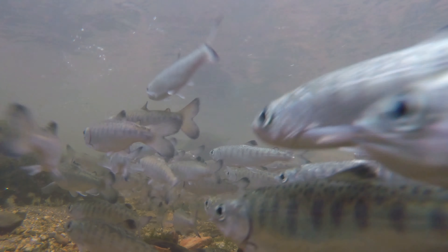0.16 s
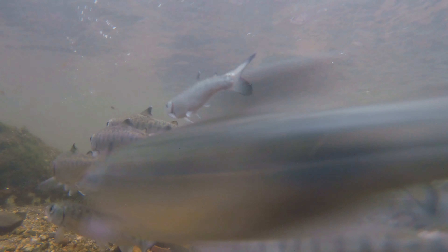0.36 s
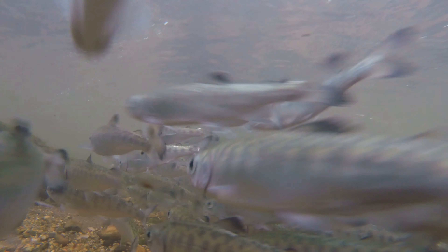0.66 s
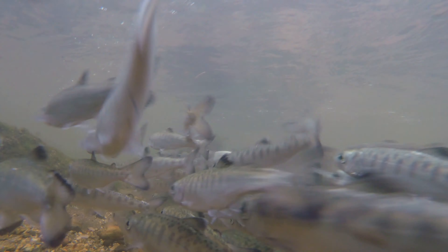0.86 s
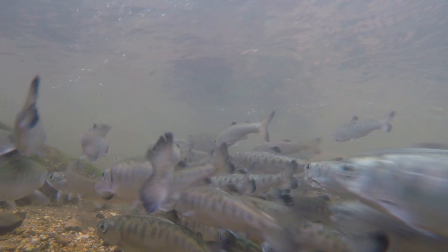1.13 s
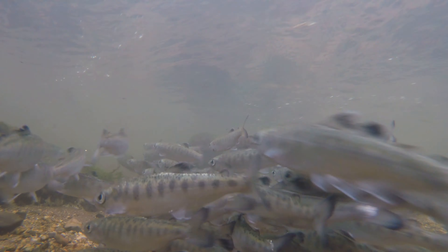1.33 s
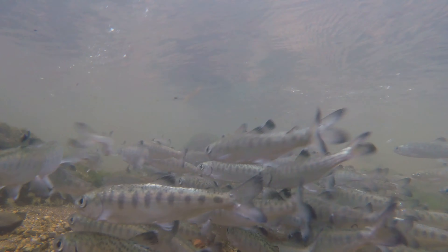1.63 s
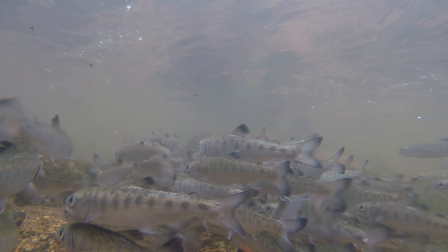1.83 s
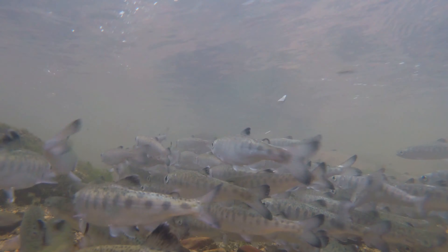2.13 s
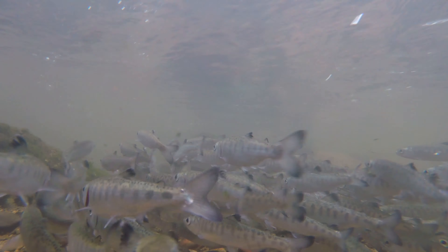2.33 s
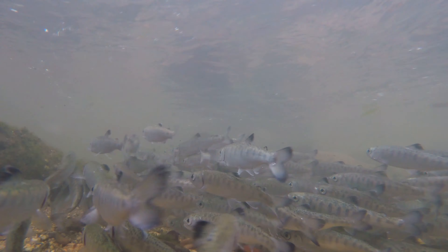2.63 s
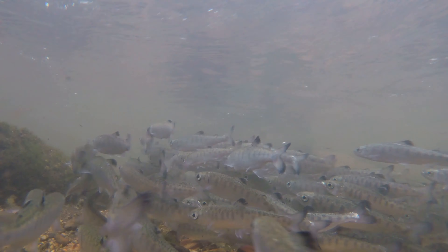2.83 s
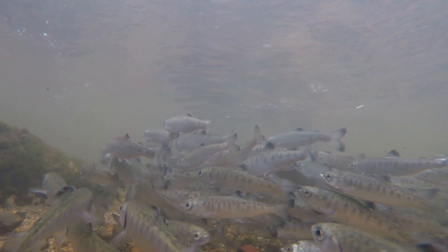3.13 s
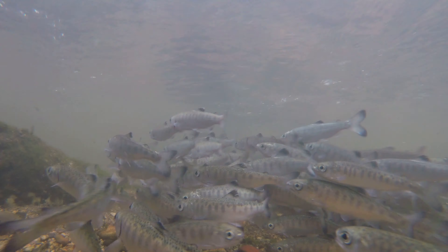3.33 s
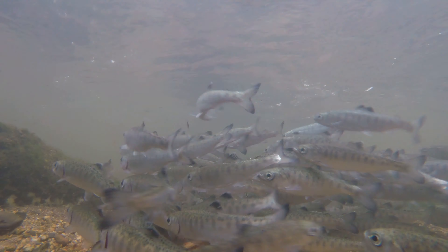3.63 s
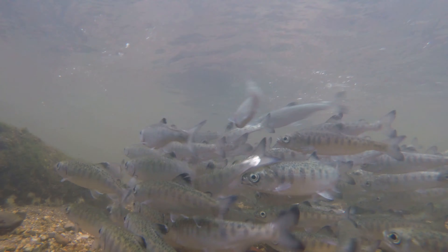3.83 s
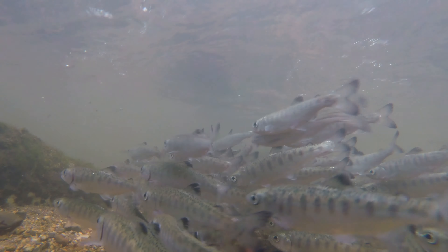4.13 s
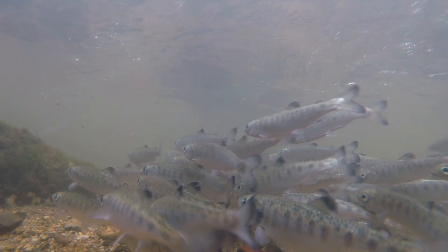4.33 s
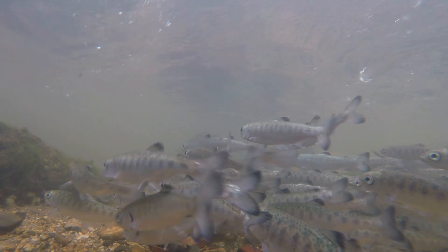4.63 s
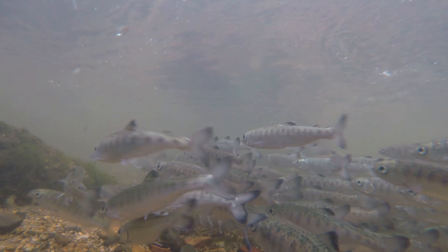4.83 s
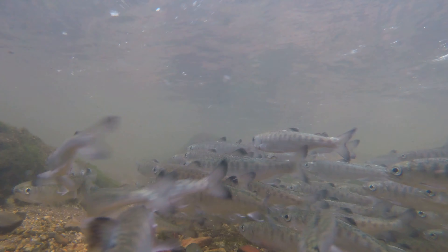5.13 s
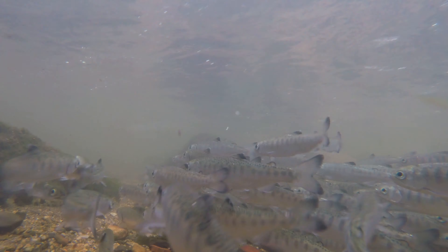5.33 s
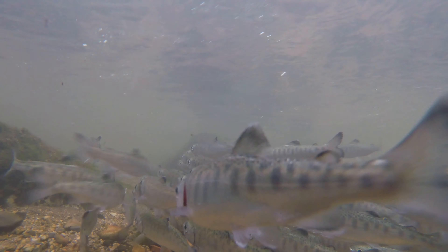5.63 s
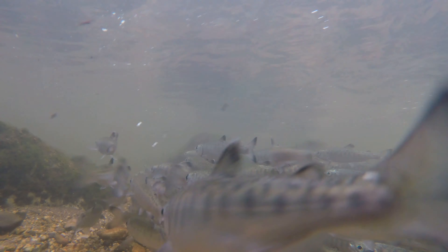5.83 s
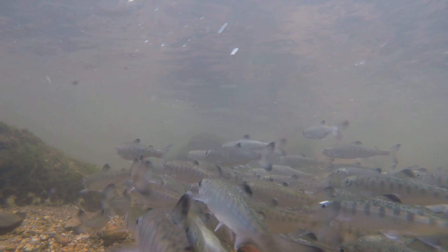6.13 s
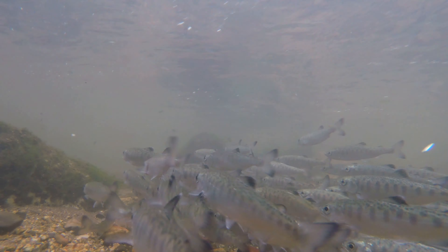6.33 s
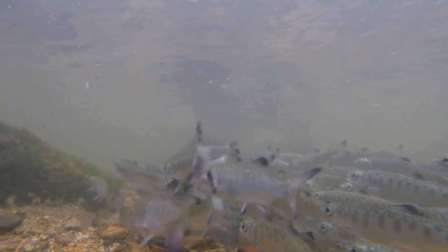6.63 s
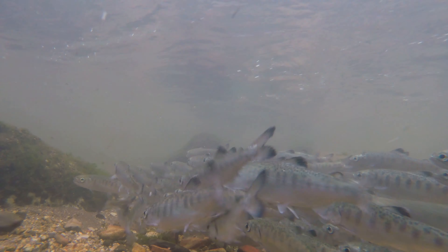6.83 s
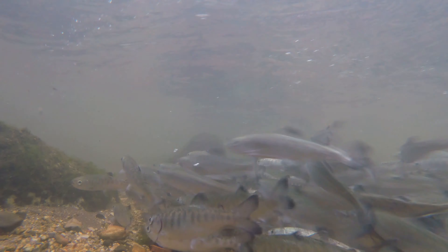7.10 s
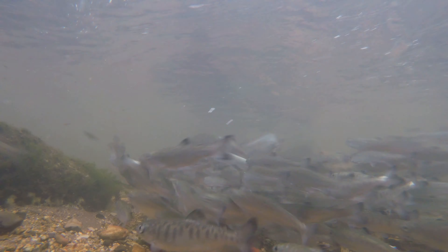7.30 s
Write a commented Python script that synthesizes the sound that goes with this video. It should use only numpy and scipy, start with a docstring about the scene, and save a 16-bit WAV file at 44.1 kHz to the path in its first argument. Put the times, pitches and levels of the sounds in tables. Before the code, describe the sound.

Muffled underwater creek rumble with deep irregular thumps, fish knocking and rubbing a sealed microphone case at the start and end, and soft bubbly gurgling between.

```python
"""On a creek bed, a microphone in a sealed case sits among a shoal of small fish.
Turbulence rumbles and eddies thump on the case: shaped noise and short, sagging low tones.
Bubbles are decaying tones, the crowded ones filtered by the resonances of the case.
Fish excite damped wall modes when they bump the case and scrub it with filtered noise.
Faint ticks and the hiss of the microphone are further bands of noise."""
import sys
import numpy as np
from scipy import signal
from scipy.io import wavfile
from scipy.ndimage import uniform_filter1d

SR = 44100
rng = np.random.default_rng(int(sys.argv[2]) if len(sys.argv) > 2 else 0)


def output_pcm(signal):
    """Save a mono or channel-first signal as 16-bit PCM at the path in sys.argv[1].

    Samples are clipped to [-1, 1] before scaling.
    """
    pcm = np.clip(np.atleast_2d(signal).T, -1, 1) * 32767
    wavfile.write(sys.argv[1], SR, np.round(pcm).astype(np.int16))


N = 329162  # length in samples

# In every spectrum table density_db is relative, per Hz: coloured() sets the rms to 1.
# Hiss of the microphone: frequency_hz, density_db
HISS_SPECTRUM = [(2500, 1), (4000, -9), (7000, 1.5), (9500, -1.5), (12000, -8.5), (14000, -10.5),
                 (15100, -17), (16500, -22)]
HISS_DB = -64.5
BAND_EDGE_HZ = 15100

# Slow buffeting of the current: time_s, level_db
BUFFET_LEVEL = [(0.0, -23), (0.48, -23), (0.73, -29), (3.09, -37.5), (5.32, -23.5), (5.69, -34.5),
                (6.48, -21.5), (6.71, -24), (7.46, -26.5)]
# Spectrum of the buffeting: frequency_hz, density_db
BUFFET_SPECTRUM = [(8, -36), (16, -8.5), (30, -5), (45, -12.5), (70, -27)]
# Spectrum of the steadier turbulent rumble: frequency_hz, density_db
RUMBLE_SPECTRUM = [(18, -40), (30, -4), (60, -0.5), (97, -1.5), (173, -9.5), (279, -17), (335, -24),
                   (472, -26.5), (560, -32), (730, -42.5), (1230, -120)]
RUMBLE_DB = -26

# Faint ticks: start_s, level_db (before the soft onset)
TICKS = [(6.785, -60), (6.801, -56), (6.822, -47), (6.85, -55), (6.879, -52), (6.893, -49), (7.243, -58),
         (7.278, -51), (7.33, -45)]
# Spectrum of the ticks: frequency_hz, density_db
TICK_SPECTRUM = [(4500, -30), (5800, 3), (7300, -14), (9000, -4), (10300, -13), (12000, -30)]
TICK_T60_S = 0.027

# Bubbly water: time_s, gurgle_db, fizz_db
CURRENT_LEVELS = [(0, -46, -64), (.8, -43, -56), (1.5, -35, -54.5), (2.2, -35.5, -56.5), (3.2, -34.5, -55),
                  (4.5, -36.5, -55), (7.46, -33.5, -53.5)]
# Transmission of the gurgle through the case: frequency_hz, density_db
CASE_GURGLE = [(280, -41), (480, -22.5), (559, -11), (742, 0.5), (811, -5.5), (1010, -13.5), (1150, -7.5),
               (1260, -16), (1400, -14), (1810, -28), (2250, -25.5), (2500, -35), (3250, -51), (5500, -120)]
# Transmission of the fizz through the case: frequency_hz, density_db
CASE_FIZZ = [(1470, -34), (2500, -5.5), (2990, 3), (3350, -1), (4010, -21), (4530, -10.5), (4890, -16.5),
             (5320, -5), (5640, -4), (6150, -5.5), (6600, -12), (7120, -18), (8000, -30), (10400, -48)]
# The largest bubbles: start_s, peak_db, pitch_hz (at the onset)
LARGE_BUBBLES = [(0.47, -34.5, 5360), (0.88, -37, 2480), (1.025, -32, 3070), (1.158, -36.5, 2770),
                 (1.353, -33, 3070), (1.369, -34, 3000), (1.412, -34, 2750), (1.483, -27.5, 900),
                 (1.58, -22, 739), (1.675, -34.5, 2791), (1.758, -34.5, 2850), (1.837, -37, 5470),
                 (1.985, -32.5, 3000), (2.019, -38.5, 6024), (2.047, -28, 734), (2.075, -23, 734),
                 (2.112, -33.5, 1980), (2.283, -34.5, 1710), (2.362, -36.5, 1840), (2.37, -32, 2870),
                 (2.406, -30, 673), (2.543, -33.5, 2130), (2.598, -29, 1430), (2.766, -36.5, 2380),
                 (2.782, -25.5, 1140), (2.92, -34.5, 5540), (3.076, -24, 760), (3.24, -33.5, 5400),
                 (3.307, -39, 5150), (3.493, -22.5, 710), (3.56, -35, 2260), (4.197, -39, 2350),
                 (4.291, -38, 3130), (4.325, -24, 1125), (4.327, -21.5, 737), (4.393, -36, 2070),
                 (4.488, -34.5, 2700), (4.527, -30, 714), (4.589, -24.5, 735), (4.693, -39, 5300),
                 (4.579, -39, 5650), (4.795, -26, 727), (4.715, -37, 5400), (4.887, -35, 3000),
                 (4.864, -36, 2150), (4.918, -33.5, 2650), (5.083, -39.5, 5259), (5.295, -25.5, 803),
                 (5.324, -35, 5830), (5.348, -34.5, 2921), (5.366, -28, 698), (5.368, -36, 3030),
                 (5.513, -38, 2880), (5.66, -33.5, 2870), (5.778, -34.5, 5370), (5.835, -23.5, 784),
                 (5.869, -33, 2290), (5.907, -30, 2740), (6.049, -32.5, 1555), (6.131, -36, 2760),
                 (6.363, -37, 5700), (6.374, -25, 770), (6.405, -25.5, 693), (6.461, -24, 884),
                 (6.433, -39, 6000), (6.559, -33, 1540), (6.573, -27, 710), (6.687, -23.5, 712),
                 (6.82, -26.5, 787), (6.89, -34, 2791), (7.012, -35.5, 2200), (7.327, -34, 2110),
                 (7.356, -28, 1097), (7.396, -27, 772)]
BUBBLE_CYCLES = 56  # cycles to die by 60 dB at 1 kHz
SMALL_DAMPING = 0.18  # exponent: smaller, higher bubbles ring for fewer cycles

# Eddies and tail strokes pushing on the case: centre_s, peak_db, pitch_hz (at the centre)
THUMPS = [(0.028, -11.5, 48.4), (0.065, -9, 80), (0.239, -10.5, 56), (0.322, -12.5, 71), (0.357, -18, 35),
          (0.476, -9, 44.7), (0.501, -7, 61), (0.53, -10, 29.8), (1.01, -10.5, 50.7), (1.382, -15, 21.8),
          (1.975, -10.5, 60), (2.257, -10.5, 68.5), (2.597, -9, 86), (2.617, -6.5, 71), (3.058, -7, 83.4),
          (3.084, -6, 94), (3.249, -19, 91), (3.499, -12, 93), (4.055, -14, 82), (4.156, -12.5, 44.3),
          (4.466, -11, 70.4), (4.896, -10.5, 24), (5.181, -14.5, 28), (5.212, -15, 64.6), (5.35, -10, 33.6),
          (5.876, -8, 79), (5.903, -12, 78.5), (6.075, -13.5, 69), (6.253, -9.5, 31.2), (6.31, -10.5, 35),
          (6.361, -13.5, 62), (6.409, -11.5, 40), (6.462, -9.5, 36), (6.519, -9, 67), (6.528, -11, 115),
          (6.561, -10, 41.4), (6.881, -16.5, 88), (6.989, -16, 79), (7.057, -13, 99), (7.097, -10.5, 40),
          (7.121, -12, 98), (7.168, -11.5, 62.4), (7.214, -17, 43.7), (7.033, -15.5, 48), (7.301, -18, 107),
          (7.452, -11.5, 79)]
SWELL_CYCLES = 0.72  # standard deviation of the Gaussian swell, in cycles
SAG = 0.032  # pitch falls by twice this share per standard deviation

# Fish bumping the case: start_s, level_db (before modal weighting), centre_hz of the blow
KNOCKS = [(.011, -10, 325), (.034, -10, 406), (.062, -13.5, 486), (.148, -18, 385), (.197, -6, 295),
          (.212, -5, 420), (.225, -11, 364), (.256, -7.5, 640), (.264, -9.5, 600), (.461, -13, 200),
          (.499, -18, 283), (.737, -10.5, 293), (.767, -21, 340), (.827, -17, 312), (.874, -23, 390),
          (.898, -16, 690), (.98, -13.5, 417), (1.039, -21, 690), (6.938, -11, 312), (6.998, -18, 300),
          (7.023, -10, 303), (7.066, -3.5, 640), (7.095, -12, 250), (7.115, -10, 310), (7.154, -6, 325),
          (7.174, -16, 204), (7.197, -15.5, 204), (7.26, -11.5, 269), (7.286, -18.5, 317),
          (7.325, -13, 310), (7.396, -20, 273)]
# Modes of the case walls: frequency_hz (at the onset), level_db, t60_s (before water damping)
WALL_MODES = [(179.8, 1.5, 0.058), (264, -4, 0.028), (292.5, -6.5, 0.087), (399, -5.5, 0.033),
              (524, -7.5, 0.028), (619, -7.5, 0.035), (700, -6.5, 0.042), (894, -18, 0.017)]
WATER_DAMPING = 0.98  # factor on the wall decay times
# Fish bodies sliding along the case, one list a pass: time_s, level_db
BRUSHES = [
    [(0, -36.5), (.3, -34.5), (.6, -38.5), (1.05, -44)],
    [(6.93, -31), (7.05, -27.5), (7.17, -20), (7.3, -31.5), (7.46, -31)],
]
# Spectrum of the sliding: frequency_hz, density_db
BRUSH_SPECTRUM = [(90, -15), (160, -8), (295, 8.5), (450, -6), (700, -1.5), (1000, -47), (1600, -42)]


def gain_of(db):
    """Level to amplitude: twenty decibels are a factor of ten."""
    return 10 ** (np.asarray(db) / 20)


def evened(x):
    """Normalisation: divides a signal by its root mean square."""
    return x / np.sqrt(np.mean(x ** 2) + 1e-20)


def white():
    """White noise: independent Gaussian samples, equal power at all frequencies."""
    return rng.standard_normal(N)


def curve(rows, column=1):
    """Linear interpolation of one table column over time."""
    rows = np.array(rows)
    return np.interp(np.arange(N) / SR, rows[:, 0], rows[:, column])


def coloured(x, points):
    """Minimum-phase filtering: the log magnitude fixes the phase of a causal response; rms 1."""
    hz, db = np.transpose(points)
    size, floor_db = 2 ** 15, -80
    log_hz = np.log(abs(np.fft.fftfreq(size, 1 / SR)) + 1)
    level_db = np.interp(log_hz, np.log(hz + 1), np.maximum(db, floor_db), left=floor_db, right=floor_db)
    # the Hilbert transform of the log magnitude gives the phase
    response = np.exp(np.conj(signal.hilbert(np.log(gain_of(level_db)))))
    impulse = np.fft.ifft(response).real[:size // 2]
    return evened(signal.oaconvolve(x, impulse)[:N])


def lumps(seconds):
    """Slow random modulation: noise averaged twice over the given time; rms 1."""
    span = max(int(seconds * SR), 2)
    once = uniform_filter1d(white(), span)
    return evened(uniform_filter1d(once, span))


def add(mix, start_s, sound):
    """Superposition: adds a sound into the mix in place, cut at the ends."""
    at = round(start_s * SR)
    sound = sound[max(-at, 0):]
    part = mix[max(at, 0):][:len(sound)]
    part += sound[:len(part)]


def ring(hz, t60, glide, rise_cycles):
    """Damped oscillator: exponential decay after a soft onset, with drifting pitch; envelope peak 1."""
    t = np.arange(0, 1.2 * t60, 1 / SR)
    onset = (1 - np.exp(-t * hz / rise_cycles)) ** 2
    envelope = onset * gain_of(-60 * t / t60)
    cycles = hz * t * (1 + glide * t / t60)
    return envelope / envelope.max() * np.sin(2 * np.pi * cycles)


def turbulence():
    """Turbulent pressure: low noise of wandering strength, as slow buffeting and a steadier rumble."""
    buffet = coloured(white(), BUFFET_SPECTRUM)
    buffet *= gain_of(curve(BUFFET_LEVEL) + 0.39 * lumps(0.05))
    rumble = coloured(white() * gain_of(2.05 * lumps(0.038)), RUMBLE_SPECTRUM)
    return buffet + rumble * gain_of(RUMBLE_DB)


def ticks():
    """Impulsive noise: short decaying bursts of high noise, perhaps grit on the case."""
    envelope = np.zeros(N)
    t = np.arange(0, TICK_T60_S, 1 / SR)
    onset = 1 - np.exp(-t / 0.0006)
    for start_s, db in TICKS:
        add(envelope, start_s, gain_of(db - 60 * t / TICK_T60_S) * onset)
    return envelope * coloured(white(), TICK_SPECTRUM)


def swarm(low_hz, high_hz, per_s, cycles, spread_db, clump_db, wash_db, count):
    """Random superposition: each bubble size rings in its own train, in clumps; far ones merge to a wash."""
    out = np.zeros(N)
    rate = per_s * gain_of(clump_db * lumps(.04))  # bubbles per second, all sizes together
    for hz in np.geomspace(low_hz, high_hz, count):
        born = rng.random(N) < rate / count / SR
        strength = born * gain_of(spread_db * np.minimum(rng.exponential(1, N), 3.5))
        t60 = cycles * rng.uniform(0.69, 2.2) / hz
        tone = ring(hz, t60, glide=0.11, rise_cycles=0.78)
        tone *= np.sqrt(hz) / np.linalg.norm(tone)  # energy in proportion to frequency
        out += signal.oaconvolve(strength, tone)[:N]
    return evened(out) + gain_of(wash_db) * white()


def crowded_bubbles():
    """Transmission: a dense gurgle and a sparser fizz, each filtered by the case."""
    gurgle = swarm(low_hz=482.8, high_hz=2556, per_s=1200, cycles=43.0,
                   spread_db=3.0, clump_db=3., wash_db=4.5, count=36)
    fizz = swarm(low_hz=2488, high_hz=7970, per_s=600, cycles=43,
                 spread_db=4.5, clump_db=4.0, wash_db=-2.5, count=34)
    out = coloured(gurgle, CASE_GURGLE) * gain_of(curve(CURRENT_LEVELS))
    return out + coloured(fizz, CASE_FIZZ) * gain_of(curve(CURRENT_LEVELS, column=2))


def large_bubbles():
    """Bubble resonance: single damped tones, rising slightly in pitch; higher ones die sooner."""
    out = np.zeros(N)
    for start_s, db, hz in LARGE_BUBBLES:
        t60 = BUBBLE_CYCLES / hz * (hz / 1000) ** -SMALL_DAMPING
        add(out, start_s, gain_of(db) * ring(hz, t60, glide=0.031, rise_cycles=0.68))
    return out


def thumps():
    """Transient pressure: a Gaussian swell of a few cycles, sagging in pitch as the eddy rolls off."""
    out = np.zeros(N)
    start_turns = rng.random(len(THUMPS))
    for (centre_s, db, hz), start_turn in zip(THUMPS, start_turns):
        width = SWELL_CYCLES / hz
        t = np.arange(-3 * width, 3 * width, 1 / SR)
        turns = start_turn + hz * t * (1 - SAG * t / width)
        swell = gain_of(db) * np.exp(-(t / width) ** 2 / 2)
        add(out, centre_s + t[0], swell * np.sin(2 * np.pi * turns))
    return out


def fish_knocks():
    """Modal excitation: a blow wakes most strongly the wall modes near its own centre frequency."""
    out = np.zeros(N)
    signs = rng.choice([-1., 1.], (len(KNOCKS), len(WALL_MODES)))
    for (start_s, db, centre_hz), knock_signs in zip(KNOCKS, signs):
        for (hz, mode_db, t60), sign in zip(WALL_MODES, knock_signs):
            reach_db = -12 * np.log2(hz / centre_hz) ** 2 - 3
            tone = ring(hz, t60 * WATER_DAMPING, glide=-0.034, rise_cycles=0.51)
            add(out, start_s, sign * gain_of(db + mode_db + reach_db) * tone)
    return out


def fish_brushes():
    """Sliding friction: rapidly fluctuating filtered noise while bodies scrub along the case."""
    out = np.zeros(N)
    scrub = coloured(white() * gain_of(2.4 * lumps(0.0076)), BRUSH_SPECTRUM)
    for rows in BRUSHES:
        first_s, last_s = rows[0][0], rows[-1][0]
        fade_times = [first_s - .02, first_s, last_s, last_s + 0.39]
        contact = np.interp(np.arange(N) / SR, fade_times, [0, 1, 1, 0])
        out += scrub * contact * gain_of(curve(rows))
    return out


def scene():
    """Linear superposition of all that reaches the microphone inside the case, one channel."""
    background = turbulence() + ticks()
    bubbles = crowded_bubbles() + large_bubbles()
    fish = fish_knocks() + fish_brushes()
    return (background + bubbles + thumps() + fish)[None]


def record(dry):
    """Self-noise and bandwidth: microphone hiss is added, then a linear-phase low-pass limits the band."""
    hiss = gain_of(HISS_DB + 0.55 * lumps(.01)) * coloured(white(), HISS_SPECTRUM)
    low_pass = signal.firwin(1023, BAND_EDGE_HZ, window=("kaiser", 9), fs=SR)
    return signal.oaconvolve(dry + hiss, low_pass[None], "same")


dry = scene()
out = record(dry)
output_pcm(out)
```